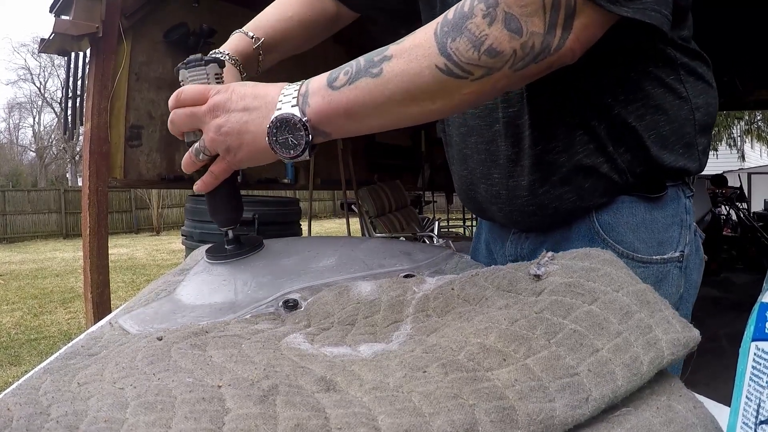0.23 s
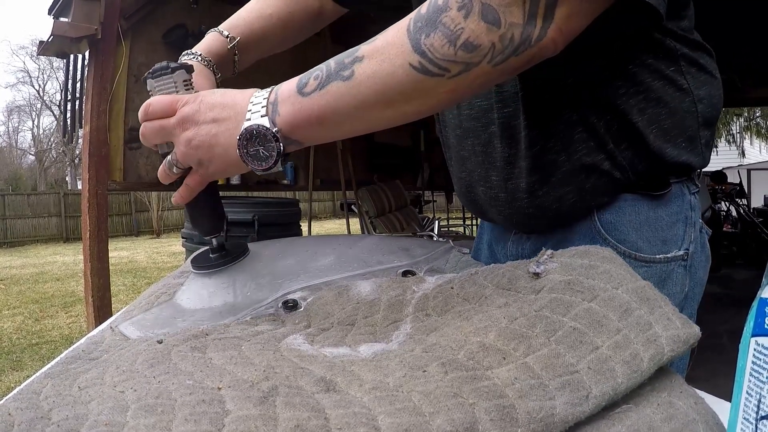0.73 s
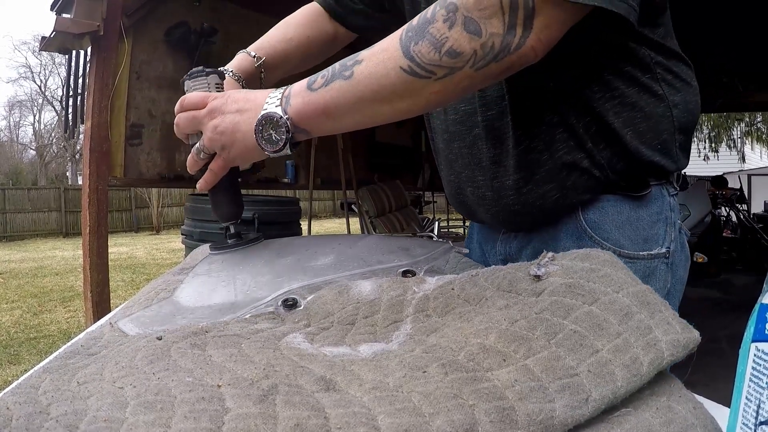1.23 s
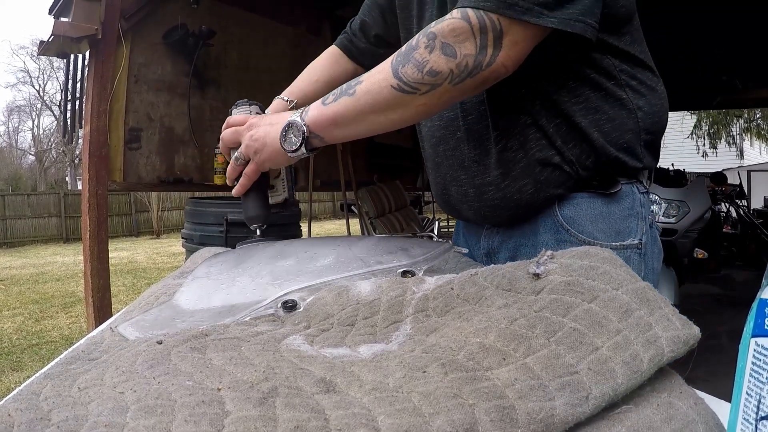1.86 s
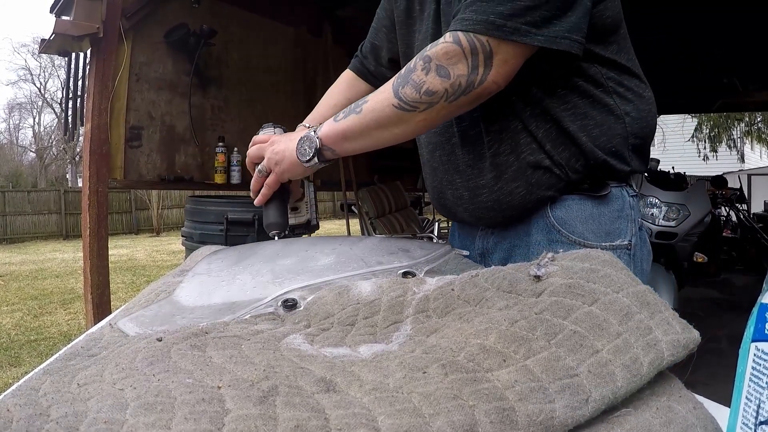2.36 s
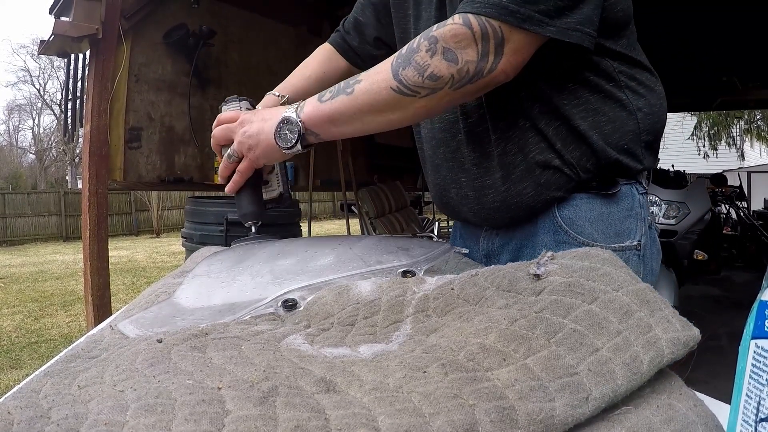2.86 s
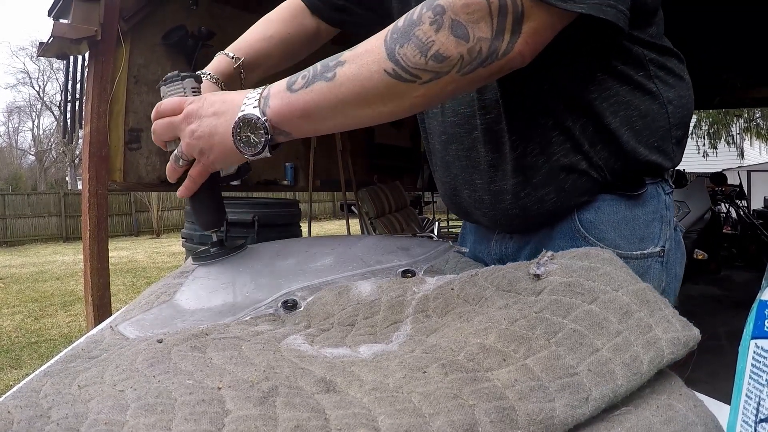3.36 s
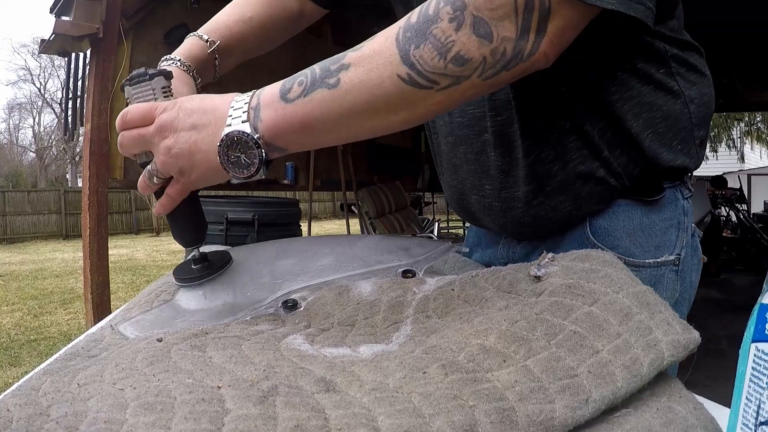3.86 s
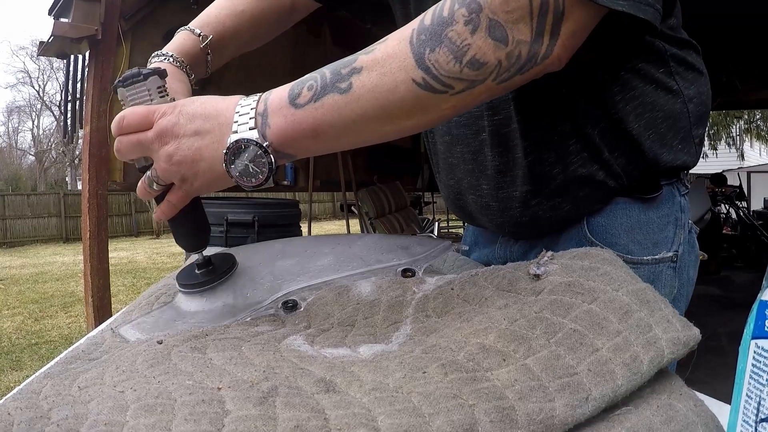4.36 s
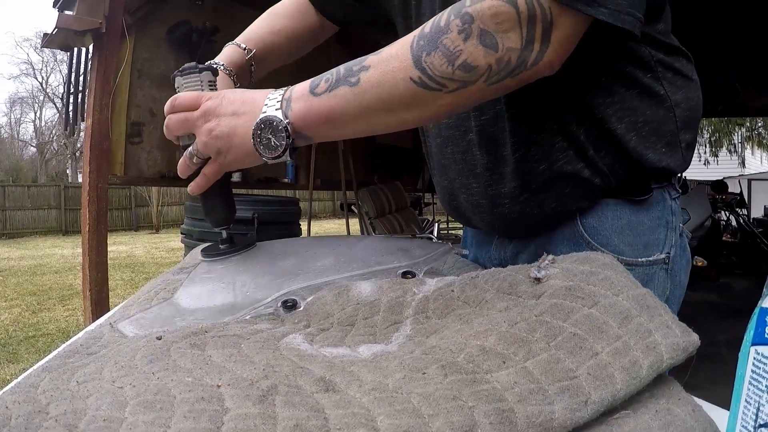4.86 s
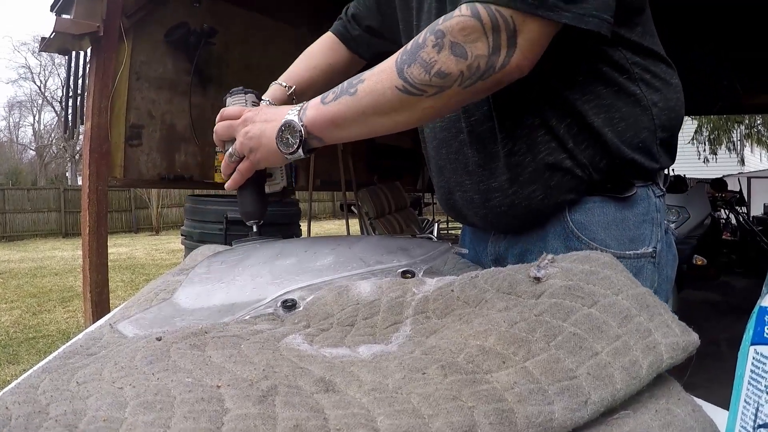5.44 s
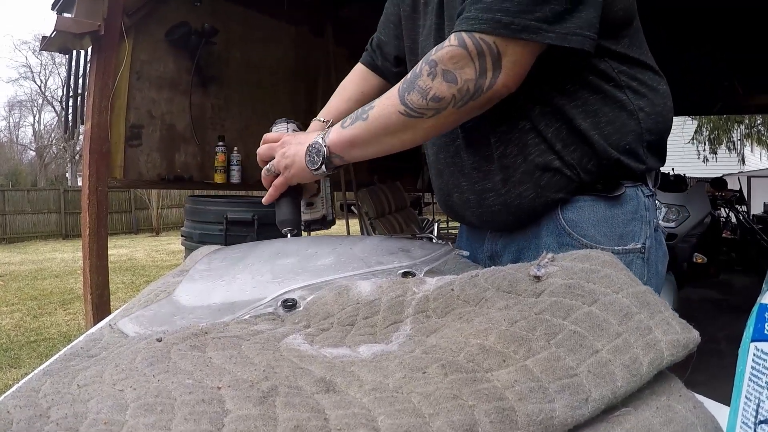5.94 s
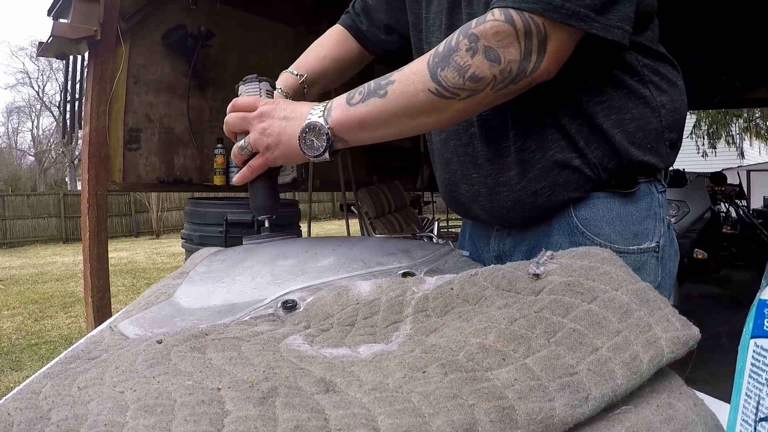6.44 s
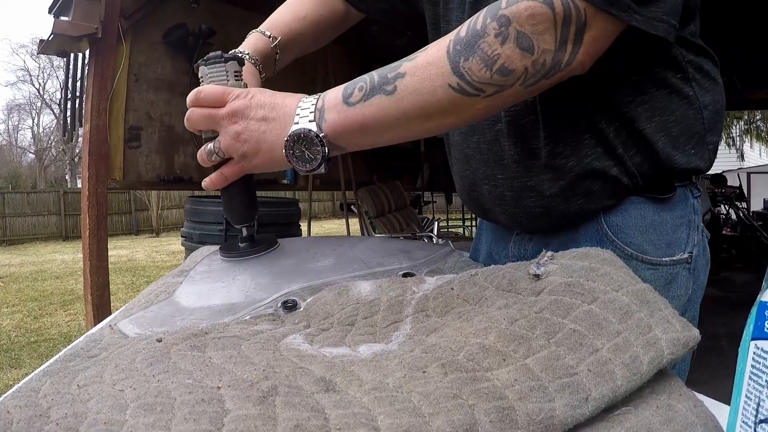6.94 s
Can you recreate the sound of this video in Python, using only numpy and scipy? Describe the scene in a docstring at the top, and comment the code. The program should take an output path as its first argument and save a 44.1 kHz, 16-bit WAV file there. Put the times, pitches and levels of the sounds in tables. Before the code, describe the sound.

A drill is already running flat out at 0 seconds and never stops through 7.2 seconds. Loud, bright vent hiss covers a hum near 330 hertz and thin, slightly rough whines around four kilohertz, while a foam pad rubs plastic with a softer mid-range scrape. Pitch stays almost steady, sagging slightly under pressure. The drill is near and bright from 0.2 to 0.7, recedes to its quietest about 2.5, swells to full near 4.3, recedes again by 6, then returns strongly to the end. Panel reflections give the hiss a gentle hollow sweep. The high whine thins out around 5.8 to 6.4, then returns. Very low panel wobble at about seven pulses a second strengthens from 3.4 to 5.6, with deep shudders near 3.9, 5, 5.3 and 6.1. Momentary dropouts in the hiss, notably 0.1, 0.5 and 3.4, leave bass and watery ringing. Close centred microphone, short garage reflections, low rumble.

```python
"""Drill polishing a plastic panel in an open garage

A corded drill runs flat out near one microphone, sweeping a polishing pad to and fro; both channels are alike.
The armature hums, fan, gears and bearings whine as sines locked to its angle; the vents hiss as coloured noise.
Delayed copies of the hiss are its echoes off the panel. The pad rubs as noise and rocks the panel once a turn,
and the panel shudders now and then. Garage reflections and a low rumble lie behind.
At listed moments a noise suppressor shuts out the hiss, leaving bass and a few ringing tones."""
import sys
import numpy as np
from scipy import signal
from scipy.fft import rfft, irfft
from scipy.io import wavfile
from scipy.ndimage import uniform_filter1d

SR = 44100
rng = np.random.default_rng(int(sys.argv[2]) if len(sys.argv) > 2 else 0)


def materialize(psi):
    """Save the field psi as 16-bit PCM at rate SR to the path in sys.argv[1].

    A 1-D psi becomes a single channel; in a 2-D psi each row is a channel.
    """
    bounded = np.clip(np.atleast_2d(psi).T, -1, 1)
    quanta = np.round(bounded * 32767).astype(np.int16)
    wavfile.write(sys.argv[1], SR, quanta)


N = 317940
TIME = np.arange(N) / SR
BIN_HZ = np.maximum(np.arange(N // 2 + 1) * SR / N, 1)

GEAR_RATIO = 48.8   # armature turns per pad turn
CUTOFF_HZ = 15330   # top of the microphone channel


def from_db(db):
    """Decibels to gain."""
    return 10 ** (np.asarray(db) / 20)


def rms_one(x):
    """Scale to unit rms."""
    return x / np.sqrt(np.mean(x ** 2) + 1e-20)


def in_time(rows):
    """Join the (seconds, value) points of a curve with straight lines, at every sample."""
    s, value = np.transpose(rows)
    return np.interp(TIME, s, value)


def drift(rate_hz):
    """Slow random motion of rms 1: noise that falls off above the rate."""
    spectrum = rfft(rng.standard_normal(N)) / (1 + (BIN_HZ / rate_hz) ** 2)
    return rms_one(irfft(spectrum, N))


def coloured_noise(colour, resonances=(), strength=1):
    """Noise of varying strength given a smooth colour with resonant humps on top; rms 1."""
    hz, db = np.transpose(colour)
    db = np.interp(np.log(BIN_HZ), np.log(hz), db)
    for centre, width, lift in resonances:
        db = db + lift / (1 + (2 * (BIN_HZ - centre) / width) ** 2)
    noise = rng.standard_normal(N) * strength
    return rms_one(irfft(rfft(noise) * from_db(db), N))


def cycle(turns):
    """One sine period per turn."""
    return np.sin(2 * np.pi * turns)


def delayed(x, lag_s):
    """Read a sound a fixed or moving time late."""
    return np.interp(TIME - lag_s, TIME, x)


def band(x, low_hz, high_hz):
    """Keep what lies between two soft edges."""
    return irfft(rfft(x) / (1 + (BIN_HZ / high_hz) ** 8 + (low_hz / BIN_HZ) ** 6), N)


def swell(s, length):
    """A smooth rise to 1 and fall around a moment; the length is between its 1/e points."""
    return np.exp(-(2 * (TIME - s) / length) ** 2)


def swells(rows):
    """Gain of a row of swells, each with its own moment, length and peak."""
    return sum(from_db(db) * swell(s, length) for s, length, db in rows)


def tone(turns, level_db, fading_db, rough):
    """A machine tone that fades in and out among reflections and is roughened by play in the parts."""
    in_step, quarter_turn_off = cycle(turns), np.cos(2 * np.pi * turns)
    roughness = drift(24) * in_step + drift(22) * quarter_turn_off
    fading = from_db(level_db + fading_db * drift(0.87))
    return fading * rms_one(in_step + rough * roughness)


# Speed of the motor, sagging when the pad is pressed down.
# Each row: time in seconds, speed in armature turns per second.
MOTOR_SPEED = [(0.0, 330.4), (0.8, 330.6), (1.3, 329.3), (1.53, 331.9), (1.85, 328.2), (2.35, 329.1),
               (2.75, 333.4), (3.4, 331.0), (4.05, 327.8), (4.35, 328.5), (4.75, 326.1), (5.0, 329.8),
               (5.6, 328.1), (6.1, 333.7), (6.5, 333.0), (7.21, 327.6)]


def armature_turns():
    """The angle is the running sum of the speed, which the pad's drag sways once a pad turn."""
    speed = in_time(MOTOR_SPEED)
    pad_turns = np.cumsum(speed) / SR / GEAR_RATIO
    sway_hz = 0.43 * cycle(pad_turns) + 0.13 * drift(7.0)
    return np.cumsum(speed + sway_hz) / SR


# The drill swings near and away, told by its hiss.
# Each row: time in seconds, hiss level in dB before the vents' overall lift.
DRILL_SWEEP = [(0.0, -27), (0.18, -25), (0.7, -25), (1.93, -29.5), (2.5, -31.5), (3.11, -28), (3.7, -25.5),
               (4.26, -24.5), (4.85, -26), (5.45, -29), (6.06, -31), (6.65, -27), (7.21, -24.5)]


def drill_sweep():
    """Level of the hiss, and how far it stands above its mean: positive when the drill is near."""
    hiss_db = in_time(DRILL_SWEEP)
    return hiss_db, hiss_db - hiss_db.mean()


# Whine of the fan as the drill turns in the hands. Each row: time in seconds, level in dB.
FAN_LEVEL = [(0.0, -51), (.45, -30.5), (.8, -41), (1.15, -35), (1.45, -40), (1.8, -37), (2.55, -41.5),
             (2.8, -35.5), (3.1, -38.5), (3.5, -39), (4.15, -34.5), (4.7, -38), (5.6, -41), (5.8, -63),
             (6.42, -81), (6.55, -33), (7.21, -34)]
# Whine of the gears. Each row: time in seconds, level in dB.
GEAR_LEVEL = [(0.0, -35), (1.05, -48), (1.35, -41), (1.65, -37), (2.2, -43), (2.7, -41), (3.6, -45.5),
              (4.5, -39), (5.1, -42), (5.35, -34.5), (5.6, -38), (5.85, -68), (6.5, -54), (7.0, -38)]
# A rough bearing tone swells, mostly midway through a stroke.
# Each row: middle in seconds, length in seconds, peak level in dB.
BEARING_SWELLS = [(1.58, 0.63, -38), (3.0, 0.37, -40), (4.1, 0.78, -37), (5.15, 0.49, -38)]
# Plain low tones of the armature, clearer when the drill is away.
# Each row: cycles per armature turn, level in dB at mid sweep, share of the sweep's swing in dB per dB.
LOW_ARMATURE_TONES = [(3, -49.5, -0.4), (5, -48.5, -0.46)]
# Fainter tones of armature, gears and bearings.
# Each row: cycles per armature turn, level in dB at mid sweep before a small trim.
FAINT_TONES = [(.75, -60), (2, -64), (2.83, -59), (4, -50), (5.93, -51), (6, -52), (6.84, -47.5),
               (7.95, -49), (8, -49), (8.82, -53), (10, -53), (11, -52), (11.3, -49), (12.4, -47.5),
               (13.75, -48), (15, -48), (16.52, -53), (16.75, -52), (17.6, -53), (19, -56), (30.75, -58),
               (36.8, -58)]
FAN_BLADES, GEAR_ORDER, BEARING_ORDER = 12, 11.8, 10.75   # cycles per armature turn
HUM_DB, HUM_FOLLOWS = -41, 0.4     # level at mid sweep, share of the sweep's swing
HUM_LEAN_DB, LEAN_S = 0.95, 0.46   # extra hum on the way in, time to lean over


def motor(turns, nearness_db):
    """Unbalance hums once a turn; fan, gears and bearings sing above it, mostly louder when near."""
    inward = np.sign(np.gradient(nearness_db))   # 1 coming in, -1 going out
    lean = uniform_filter1d(inward, size=int(LEAN_S * SR))
    hum_db = HUM_DB + HUM_FOLLOWS * nearness_db + HUM_LEAN_DB * lean
    out = tone(turns, hum_db, fading_db=-0.8, rough=0.12)
    out += tone(FAN_BLADES * turns, in_time(FAN_LEVEL), fading_db=1.2, rough=.15)
    out += tone(GEAR_ORDER * turns, in_time(GEAR_LEVEL), fading_db=1.5, rough=.3)
    bearing_turns = BEARING_ORDER * turns + .6 * drift(35)
    out += swells(BEARING_SWELLS) * tone(bearing_turns, 0, fading_db=1.5, rough=0.73)
    for multiple, level_db, follows in LOW_ARMATURE_TONES:
        out += tone(multiple * turns, level_db + follows * nearness_db, fading_db=0.0, rough=.05)
    for multiple, level_db in FAINT_TONES:
        beaming = min(multiple / FAN_BLADES, 1)   # short waves waver, fade and beam more
        level_db = level_db - .3 + beaming ** 2 * nearness_db
        out += tone(multiple * turns, level_db, fading_db=3.1 * beaming, rough=beaming ** 2)
    return out


# Smooth colour of the vent air. Each row: frequency in Hz, relative level in dB per Hz.
AIR_COLOUR = [(500, -30), (1500, -8.5), (2400, -5.5), (3300, -1), (4400, -0.5), (5400, -4), (6200, -4.3),
              (8200, -2), (9500, -10), (10000, -12), (11800, -8.5), (13300, -4), (14300, -7), (15300, -6),
              (16000, -15)]
# Resonances of the vents and housing. Each row: centre in Hz, width in Hz, lift in dB.
HOUSING_RESONANCES = [(2630, 280, 3), (3900, 270, 1.5), (4900, 900, 6), (7450, 600, 2.5), (9390, 560, 10),
                      (10850, 660, 5.5), (12800, 380, 4), (13630, 420, 5)]
HISS_DB = 2.5   # lift of the whole vent air above the sweep curve


def vent_air(turns, hiss_db, nearness_db):
    """The fan chops the air; the top treble beams and flickers, and the panel throws it back."""
    chop = 1 + 0.14 * cycle(2 * turns) + 0.13 * cycle(3 * turns)
    flutter = from_db(0.4 * drift(90))
    air = coloured_noise(AIR_COLOUR, HOUSING_RESONANCES, chop * flutter)
    top = irfft(rfft(air) / (1 + (11000 / BIN_HZ) ** 8), N)
    top_gain = from_db(0.22 * nearness_db + 1.3 * drift(55))
    air = air + top * (top_gain - 1)
    return from_db(hiss_db + HISS_DB) * rms_one(air + panel_echoes(air))


# Lag of the panel's echo, longer when the drill is near. Each row: time in seconds, lag in seconds.
PANEL_ECHO_LAG = [(0.0, .00057), (.6, .0006), (2.1, .00032), (2.55, .00032), (2.85, .00042), (3.9, .00059),
                  (4.45, .00059), (5.1, .00043), (5.9, .0003), (6.5, .00045), (7.21, .00058)]
ECHO_DB, LATE_ECHO_S = -14, .00013   # level of the echo pair, time between the two
HIDDEN_LAG_S, OPEN_LAG_S = .00031, .00041   # lags at which the echo is gone over the panel's crown, and whole
GLANCE_DB, GLANCE_LATE_S = -9.5, .00004     # treble glancing off all along the stroke, just after the echo


def panel_echoes(air):
    """Reflections off the panel sweep peaks and notches through the hiss; they climb as the lag shortens."""
    lag_s = in_time(PANEL_ECHO_LAG)
    middle, treble = band(air, 1400, 7000), band(air, 6300, 10500)
    in_view = np.interp(lag_s, [HIDDEN_LAG_S, OPEN_LAG_S], [0, 1])
    echo_pair = delayed(middle, lag_s + LATE_ECHO_S) - delayed(middle, lag_s)   # the first is upside down
    glance = from_db(GLANCE_DB) * delayed(treble, lag_s + GLANCE_LATE_S)
    return from_db(ECHO_DB) * in_view * echo_pair + glance


# Colour of the rubbing. Each row: frequency in Hz, relative level in dB per Hz.
RUB_COLOUR = [(100, -9), (160, -9), (290, -6.5), (400, -11), (520, -9.5), (680, -7), (900, -1),
              (1120, -4.5), (1350, -6.5), (1700, -1), (2100, 1.5), (2800, 2), (4500, -18), (9000, -14.5)]
# Resonances of the panel. Each row: centre in Hz, width in Hz, lift in dB (negative for a dent).
PANEL_RESONANCES = [(930, 100, -1.5), (1352, 190, 7.5), (1933, 180, 4.5), (2175, 93, 4)]
RUB_DB, RUB_FOLLOWS = -33.5, 0.24   # level at mid sweep, share of the sweep's swing


def pad(turns, nearness_db):
    """Foam rubs the plastic, gripping unevenly on every pad turn."""
    grip_db = 0.12 * cycle(turns / GEAR_RATIO) + 1.34 * drift(22)
    level_db = RUB_DB + RUB_FOLLOWS * nearness_db + grip_db
    return from_db(level_db) * coloured_noise(RUB_COLOUR, PANEL_RESONANCES)


# Bouts of harder rocking. Each row: middle in seconds, length in seconds, peak in dB added to the steady rocking.
ROCKING_BOUTS = [(.6, 0.23, -26.5), (1.7, 0.27, -25.5), (3.45, 0.75, -22), (4.8, 0.86, -22), (5.4, 1, -21)]
# The panel shudders. Each row: middle in seconds, length in seconds, peak in dB added to the steady tremble.
PANEL_SHUDDERS = [(3.5, 0.29, -39), (3.87, 0.31, -31), (4.7, 0.3, -40), (5.0, 0.29, -24),
                  (5.32, 0.22, -22.5), (5.62, .3, -30), (6.11, 0.23, -24), (7.2, .3, -57)]
# Colour of the shudder. Each row: frequency in Hz, relative level in dB per Hz.
SHUDDER_COLOUR = [(12, -13), (21, 11.5), (27, 9.5), (37, -11), (55, -9.5), (80, -21), (150, -28.5),
                  (400, -56)]
ROCKING_DB, TREMBLE_DB = -28.5, -48   # the panel always rocks and trembles a little


def panel(turns):
    """The off-centre pad rocks the panel once a pad turn, harder in bouts, and sets it shuddering."""
    rocking_gain = from_db(ROCKING_DB) + swells(ROCKING_BOUTS)
    shudder_gain = from_db(TREMBLE_DB) + swells(PANEL_SHUDDERS)
    rocking = rocking_gain * rms_one(cycle(turns / GEAR_RATIO))
    return rocking + shudder_gain * coloured_noise(SHUDDER_COLOUR)


def garage(x, t60, count=60):
    """Scattered reflections from walls and shelves ripple the spectrum."""
    lags = rng.uniform(.003, .06, count)
    echoes = np.zeros(SR // 4)
    echoes[(lags * SR).astype(int)] = rng.choice([-1, 1], count) * from_db(-60 * lags / t60)
    return signal.fftconvolve(x, echoes / np.sqrt(np.sum(echoes ** 2)))[:N]


# Low rumble behind the drill. Each row: frequency in Hz, relative level in dB per Hz.
RUMBLE_COLOUR = [(15, -0.5), (45, 0.5), (80, -2.5), (120, -12), (250, -23.5), (1000, -48)]
RUMBLE_DB, RUMBLE_WANDER_DB = -46, 0.9


def rumble():
    """Low background noise whose level wanders slowly."""
    level_db = RUMBLE_DB + RUMBLE_WANDER_DB * drift(1.9)
    return from_db(level_db) * coloured_noise(RUMBLE_COLOUR)


KEPT_WIDTH_HZ, KEPT_APART_HZ, KEPT_BASS_HZ, KEPT_DB = 48, 210, 390, 3.5   # KEPT_DB lifts the ringing tones


def strongest_tones(piece, count=22):
    """Keep only the bass and the narrow peaks that stand out most, favouring the lower ones."""
    hz = np.arange(len(piece) // 2 + 1) * SR / len(piece)
    power = uniform_filter1d(np.abs(rfft(piece * np.hanning(len(piece)))) ** 2, size=7)
    surroundings = uniform_filter1d(power, size=80)
    standing = power / (surroundings ** .8 * (hz + 1) ** .22)
    standing = standing * (hz > 2 * KEPT_BASS_HZ) * (hz < CUTOFF_HZ)
    peaks = signal.find_peaks(standing, distance=KEPT_APART_HZ / hz[1])[0]
    strongest = peaks[np.argsort(-standing[peaks])[:count]]
    kept = sum(np.exp(-((hz - hz[p]) / KEPT_WIDTH_HZ) ** 2) for p in strongest)
    bass = 1 / (1 + (hz / KEPT_BASS_HZ) ** 20)
    return irfft(rfft(piece) * (from_db(KEPT_DB) * kept + bass))


# Instants when the hiss thins out.
# Each row: middle in seconds, length in seconds between the points where it is 86 percent shut.
HISS_DIPS = [(.095, .031), (.478, .031), (.831, .012), (.916, .011), (1.022, .01), (1.129, .013),
             (2.559, .011), (2.665, .014), (3.369, .05), (3.54, .011), (3.816, .01), (3.902, .012),
             (4.01, .012), (4.97, .011), (5.842, .017), (6.719, .01), (6.91, .01)]
DIP_DB, DIP_RAMP_S = -33, .011   # what is left of the full sound, time of a whole ramp


def suppressor(x, size=4096):
    """In each dip a noise suppressor shuts out the hiss and leaves bass and a few ringing tones."""
    out = x.copy()
    for s, length in HISS_DIPS:
        start = int(s * SR) - size // 2
        span = slice(start, start + size)
        ramp = 0.86 + (length / 2 - abs(TIME[span] - s)) / DIP_RAMP_S
        shut = np.clip(ramp, 0, 1 - from_db(DIP_DB))
        out[span] += shut * (strongest_tones(x[span]) - x[span])
    return out


def scene():
    """The armature's angle and the sweep drive the drill, pad and panel; both channels hear the same."""
    turns = armature_turns()
    hiss_db, nearness_db = drill_sweep()
    noise = vent_air(turns, hiss_db, nearness_db) + pad(turns, nearness_db)
    noise = noise + from_db(-11.5) * garage(noise, t60=0.13)
    mono = motor(turns, nearness_db) + noise + panel(turns) + rumble()
    return np.array([mono, mono])


def record(dry):
    """The suppressor cuts in at its listed moments, then the top is cut steeply."""
    steep_cut = signal.ellip(12, .1, 80, CUTOFF_HZ, fs=SR, output="sos")
    return signal.sosfilt(steep_cut, [suppressor(x) for x in dry])


dry = scene()
out = record(dry)
materialize(out)
```